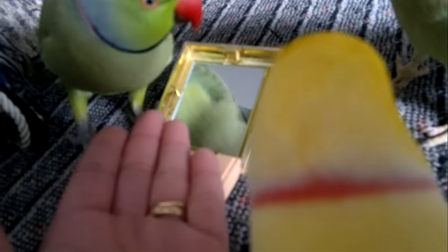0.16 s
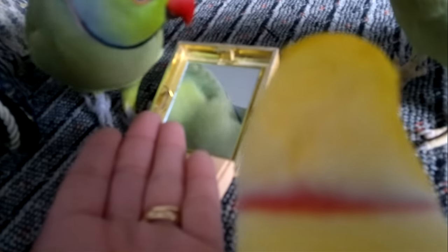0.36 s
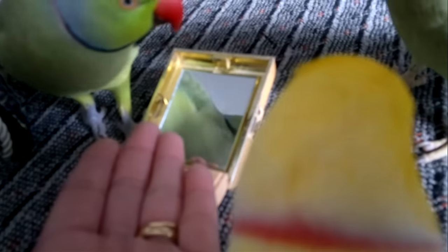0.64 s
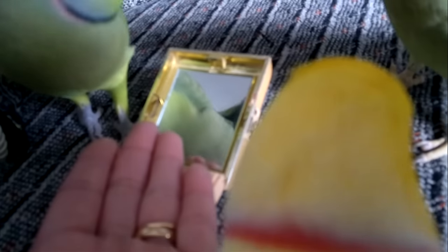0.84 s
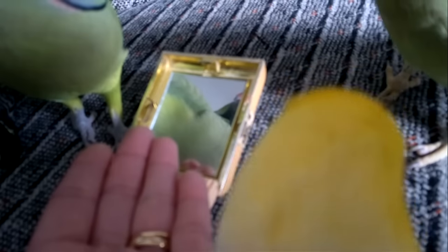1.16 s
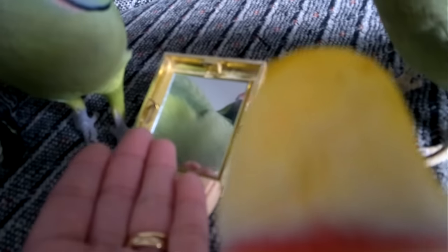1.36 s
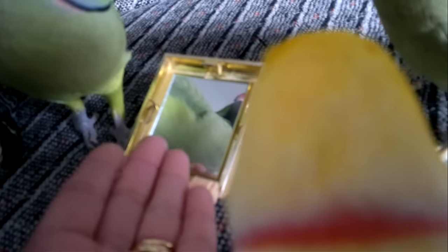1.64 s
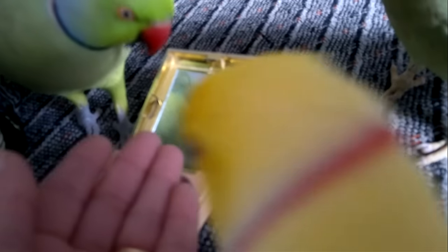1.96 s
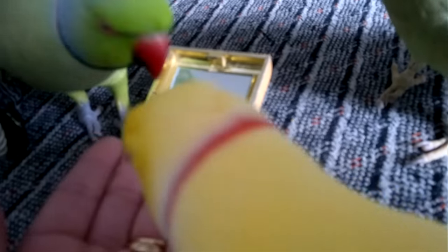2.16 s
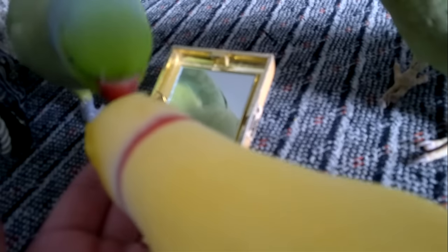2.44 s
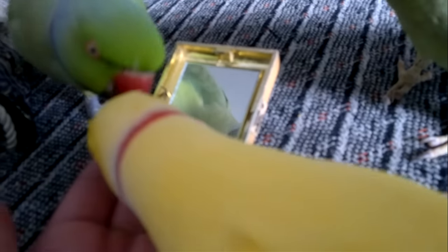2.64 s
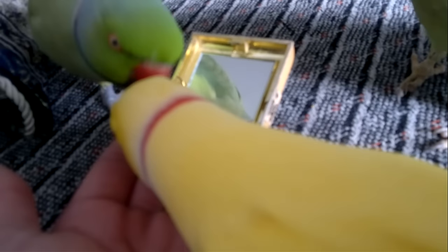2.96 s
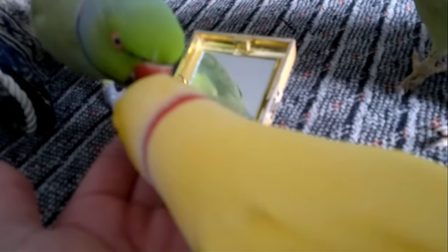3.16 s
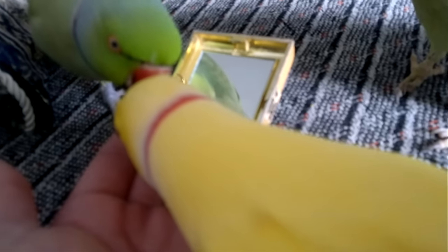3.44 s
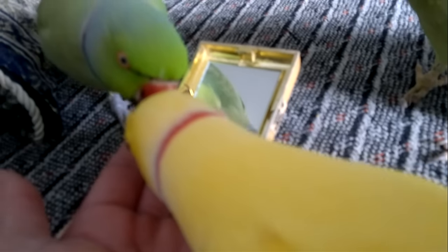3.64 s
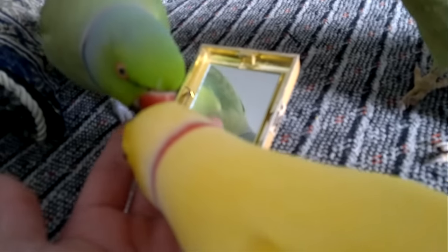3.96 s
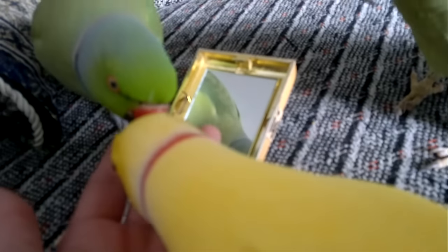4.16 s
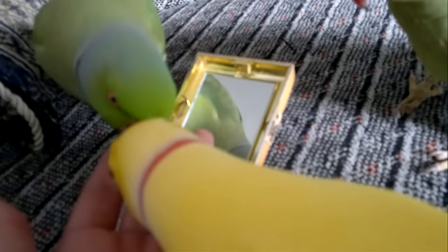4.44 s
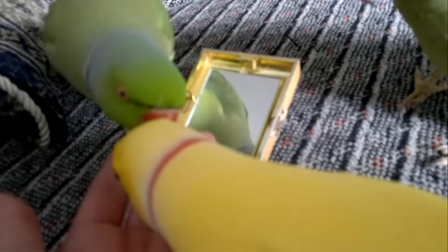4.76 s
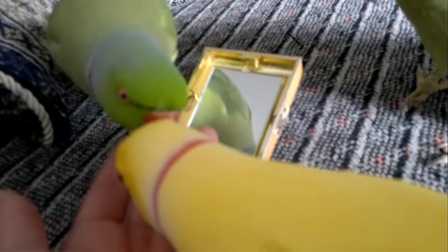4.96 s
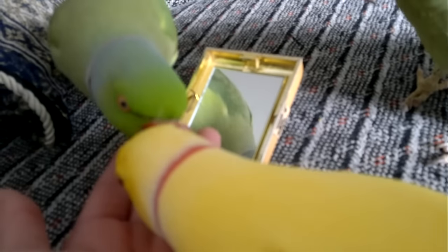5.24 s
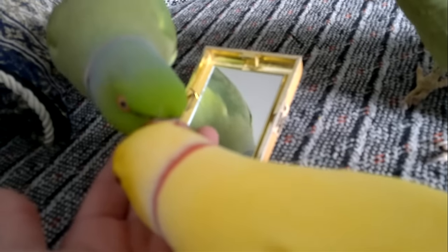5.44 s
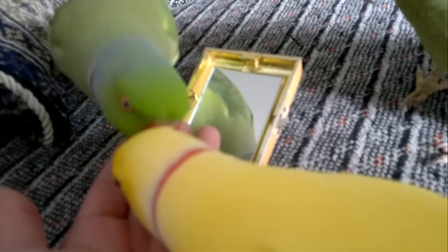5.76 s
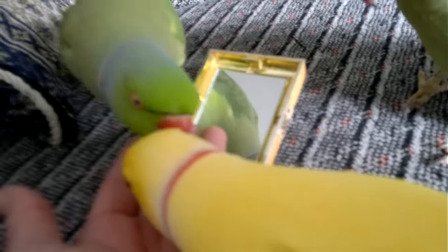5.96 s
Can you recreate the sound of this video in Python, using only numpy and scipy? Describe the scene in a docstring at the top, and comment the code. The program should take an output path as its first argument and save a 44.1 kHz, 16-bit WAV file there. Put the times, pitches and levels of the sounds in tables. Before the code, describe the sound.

First near silence: low handling shifts, light rustles, soft toneless bird puffs and one brief whistled squeak. After two seconds a few isolated beak clicks, then a run of sharp, ringing double-click pecks on a little mirror, four to five a second to the end, with dry taps on its frame growing busier and louder. Furnished room, very close stereo microphone, sound reaching the left slightly earlier and the right darker.

```python
"""Still air of a quiet, furnished room lasts throughout; hand shifts rumble early, brief rustles come now and then.
Close by on a carpet a pet parrot chuffs (noise through a throat resonance), peeps, whines and squeaks (whistles).
It pecks a small framed mirror four to five times a second, in ringing beak clicks and frame knocks,
with duller taps before, among and after the pecks.
Two close microphone ports hear it, the right one later and darker, with a diffuse room tail behind."""
import sys
import numpy as np
from scipy import signal
from scipy.fft import rfft, irfft, next_fast_len
from scipy.io import wavfile
from scipy.ndimage import uniform_filter1d, minimum_filter1d

SR = 44100
rng = np.random.default_rng(int(sys.argv[2]) if len(sys.argv) > 2 else 0)


def unload_audio(sound):
    """Save the sound as a 16-bit wav file, at the path given as the first command line argument."""
    columns = np.transpose(np.atleast_2d(sound))
    # keep every value between -1 and 1, then stretch to whole-number steps
    steps = np.round(np.clip(columns, -1, 1) * 32767)
    wavfile.write(sys.argv[1], SR, steps.astype(np.int16))


N = 268701
TIME = np.arange(N) / SR
BRIEF = np.arange(2048) / SR  # clock of one short impact

# Still room air: pitch_hz, relative level_db per Hz
ROOM_AIR = [(25, -13.5), (70, -2.5), (130, -10.5), (280, -14.5), (800, -20), (2000, -25.5), (4000, -31),
            (9000, -35), (12000, -36), (15000, -57.5)]
# Hand shifts, before the port gain: middle_s, rumble level_db, brushing level_db, half_length_s
HAND_SHIFTS = [(0.026, -61.5, -62, 0.063), (0.266, -60, -54.5, 0.078), (0.56, -62.5, -74.5, 0.22),
               (1.567, -59.5, -68.5, 0.18), (2.027, -60.5, -81, 0.042)]
# Spectra of handling rumble, hand brushing and rustling: pitch_hz, relative level_db per Hz
RUMBLE_SPECTRUM = [(20, 1), (45, 0), (72, 5), (110, -2.5), (200, -23), (400, -69)]
BRUSH_SPECTRUM = [(100, -26), (200, -6.5), (275, -0.5), (350, -13), (480, -11.5), (800, -16), (2000, -27),
                  (5000, -36)]
RUSTLE_SPECTRUM = [(1000, 2.5), (2500, -3), (6000, -2.5), (9000, 0), (12000, -6.5), (15000, -11)]
# Brief rustles, and the squeak's hiss, before the port gain: middle_s, level_db, half_length_s
BRIEF_RUSTLES = [(0.283, -73, 0.38), (0.915, -67, 0.012), (1.007, -63, 0.0062), (1.056, -66, 0.06),
                 (1.414, -56.5, 0.014), (1.789, -68, 0.013), (4.046, -58, 0.0063), (4.412, -59, 0.0086),
                 (5.008, -60, .017)]
# Dull taps on the frame: time_s, clack peak level_db, knock and tick level_db relative to the clack
FRAME_TAPS = [(0.485, -61, 6.5, -25), (1.199, -48.5, -2, -3.5), (1.5484, -35, -5.5, -12.5),
              (2.6282, -44.5, -25.5, -1), (2.7031, -40.5, -12, -17), (2.8266, -34.5, 0.5, -27.5),
              (2.9796, -47, -3.5, -30), (4.041, -26, -10.5, -28), (4.276, -29.5, -9.5, -15.5),
              (4.3024, -24, -14.5, -25), (4.404, -19, -30, -40), (4.416, -21.5, -17, -20),
              (4.5227, -34.5, -7.5, -16), (4.553, -23.5, -10, -14.5), (4.7859, -31, 0, -9.5),
              (4.813, -25.5, -9.5, -16), (5, -25.5, -16, -11.5), (5.0244, -22.5, -15.5, -16.5),
              (5.2391, -40, -8.5, -13), (5.3136, -7.5, -16.5, -11.5), (5.4489, -39.5, -5, -9.5),
              (5.5548, -11.5, -10.5, -12.5), (5.566, -22.5, -2, -34), (5.586, -24.5, -12, -16.5),
              (5.7358, -50, -5, -5.5), (5.8195, -26.5, -4, -7), (5.833, -16.5, -12, -23.5),
              (6.0722, -25.5, -2.5, -9.5), (6.0843, -26.5, -1, -27)]
# A tap's dry body, and the tick of the beak tip: pitch_hz, relative level_db
CLACK_SPECTRUM = [(500, -43), (1100, -10.5), (1700, 8), (2500, 6.5), (3800, -1.5), (5200, -7),
                  (7000, -32.5), (9000, -37)]
TICK_SPECTRUM = [(2000, -37), (4200, 1.5), (5800, 13.5), (7300, 2.5), (9500, 3), (12000, -4.5),
                 (15000, -38.5)]
# Modes of mirror and frame, damped by the carpet: nominal pitch_hz, nominal level_db, t60_s
FRAME_MODES = [(314, -7.5, 0.0099), (642, 0.5, 0.015), (1059.6, 1, 0.011)]
# Tiny rising peep: time_s, pitch_hz, fundamental level_db
PEEP_PATH = [(.782, 400, -62), (.797, 657, -47), (.81, 907, -47.5), (.822, 1034, -84)]
# Soft chuffs, and the squeak's breath, before a common trim: time_s, level_db, centre pitch_hz
CHUFF_CALLS = [(0.795, -55.5, 1650), (1.081, -57, 1160), (1.204, -53.5, 1710), (1.403, -57.5, 1900),
               (1.546, -52.5, 1990), (1.675, -55.5, 1880), (2.022, -53, 1840), (2.777, -66.5, 1614),
               (3.042, -52.5, 1280)]
# Faint whine that wavers and drops, before a 1 dB cut: time_s, pitch_hz, level_db
WHINE_PATH = [(1.045, 1366, -79), (1.065, 1394, -50), (1.09, 1434, -58), (1.108, 1130, -69),
              (1.122, 960, -45.5), (1.145, 940, -82)]
# The squeak: time_s, pitch_hz, fundamental level_db
SQUEAK_PATH = [(1.37, 2680, -50), (1.377, 2690, -53), (1.386, 2590, -23), (1.402, 2570, -12.5),
               (1.42, 2658, -21.5), (1.432, 2610, -39.5), (1.462, 2703, -48)]
# Single beak clicks, soft to hard: time_s, ring level_db, ring pitch_hz,
# knock level_db relative to the ring, extra scrape level_db
SINGLE_CLICKS = [(2.171, -32.5, 2450, -9.5, -11.5), (2.349, -46.5, 2450, -14.5, 0),
                 (2.4745, -30.5, 2560, -11.5, -9), (2.4807, -35, 2570, -13, -12),
                 (2.6437, -6, 2540, -26.5, -3), (5.8250, -10, 1710, -20.5, 9.5)]
# Pecks: first contact time_s, last contact time_s, first, middle and last level_db,
# last ring pitch_hz, last knock level_db relative to the ring, extra scrape level_db
PECK_ROWS = [(2.8572, 2.879, -1.5, -11.5, -8.5, 3078, -16, 0),
             (3.0563, 3.0822, -0.5, -5, -1, 2878, -20, -8), (3.2646, 3.2809, 1, -3.5, 5.5, 3050, -24.5, 2),
             (3.4751, 3.4995, -5, 1, 0.5, 3117, -18, 0), (3.709, 3.721, -3.5, -5.5, 0.5, 2875, -22.5, 4.5),
             (3.9251, 3.9366, 0, -15, 1.5, 2810, -15.5, 6.5),
             (4.1493, 4.159, -7.5, -7.5, 2, 2590, -26.5, 3),
             (4.368, 4.3817, -3.5, -8, -6.5, 2450, -23.5, 8.5),
             (4.6003, 4.6183, 2, -15, -1.5, 2650, -20, 5.5),
             (4.8291, 4.8427, -3, -1.5, -4.5, 2676, -23.5, 8.5), (5.0648, 5.0788, -7, -5, -4, 2600, -20, 8),
             (5.295, 5.3106, -5, 0.5, -4, 2980, -12, 9.5)]
# Two pecks shove the mirror against the floor: start_s, starting level_db, pitch_hz
FLOOR_THUMPS = [(3.938, -22.5, 300), (4.83, -15.5, 169)]
# Right port against the left: pitch_hz, level_db
RIGHT_PORT_SHADE = [(100, -3), (800, -4), (1600, 2), (2600, 0), (3500, -2), (5000, -9), (9000, -17),
                    (14000, -7)]
# Lead of the left port for sound from the mirror: pitch_hz, phase_radians
MIRROR_PORT_PHASE = [(0, 0), (430, 0.1), (1380, 1.0), (2070, 3.2), (3100, 4.7), (3450, 5.6), (3700, 5.7),
                     (3960, 6.7), (4310, 6.4), (4740, 7.4)]
# Room tail: pitch_hz, t60_s
ROOM_DECAY = [(300, 0.078), (1100, 0.16), (2150, 0.33), (3300, 0.15), (5000, 0.16), (7000, 0.023),
              (14000, 0.051)]
# Room tail colour: pitch_hz, relative level_db
ROOM_TINT = [(200, 0), (700, 0.5), (1500, 7.5), (2400, -4), (3400, 4), (4800, 3), (7000, -7), (14000, 5)]

# Ring and knock as the beak lands; both move to the row's last values as it presses on
FIRST_HZ, FIRST_KNOCK_DB = 2341, -24.5
MIDDLE_SHARE, PRESS_POWER = 0.37, 2.2  # when the middle contact comes; how late the pressure builds
# Each contact chatters: gap between clicks, loss times the click's number squared
CHATTER_S, CHATTER_LOSS_DB = 0.0025, 3
SLIP_DB, SLIP_SCATTER_DB = -16, 4  # tiny slips, against the peck's mean level
# The mirror rattles on after the last contact: mean gap, first level, loss a bounce
SETTLE_S, SETTLE_DB, SETTLE_LOSS_DB = 0.0064, -27, 4
TOP_HZ = 15800  # band limit


def amp(db):
    """Decibels to gain."""
    return 10 ** (np.asarray(db) / 20)


def unit(x):
    """Scale to rms 1."""
    return x / np.sqrt(np.mean(x ** 2) + 1e-20)


def crest(x):
    """Scale to an envelope peak of 1."""
    return x / np.abs(signal.hilbert(x)).max()


def along(points, hz):
    """Read (Hz, value) points on a log frequency axis."""
    f, values = np.transpose(points)
    return np.interp(np.log(hz + 1), np.log(f), values)


def filtered(x, response):
    """Multiply the spectrum of x by a complex response of frequency."""
    size = next_fast_len(N + SR // 2)
    spectrum = rfft(x, size) * response(np.fft.rfftfreq(size, 1 / SR))
    return irfft(spectrum, size)[..., :N]


def add(track, s, sound):
    """Mix a sound into a track at time s."""
    part = track[max(round(s * SR), 0):][:len(sound)]
    part += sound[:len(part)]


def noise(spectrum):
    """Coloured noise of rms 1, unrelated at the two ports."""
    white = rng.standard_normal((2, N))
    return unit(filtered(white, lambda hz: amp(along(spectrum, hz))))


def swell(middle_s, half_length_s):
    """A bell-shaped rise and fall of level."""
    return np.exp(-0.5 * ((TIME - middle_s) / half_length_s) ** 2)


def background(floor_db=-69):
    """Steady room air, with swells of handling rumble, brushing and brief rustles."""
    rumble = sum(amp(db) * swell(s, length) for s, db, _, length in HAND_SHIFTS)
    brush = sum(amp(db) * swell(s, length) for s, _, db, length in HAND_SHIFTS)
    rustle = sum(amp(db) * swell(s, length) for s, db, length in BRIEF_RUSTLES)
    air = amp(floor_db) * noise(ROOM_AIR)
    air += rumble * noise(RUMBLE_SPECTRUM)
    air += brush * noise(BRUSH_SPECTRUM)
    air += rustle * noise(RUSTLE_SPECTRUM)
    # each port shares a little of the other's air
    shared = air + 0.12 * air[::-1]
    # port gain: left 1.5 dB louder, right 1.5 dB softer
    return shared * amp([[1.5], [-1.5]])


def snap(spectrum, t60):
    """A decaying burst of grit through a causal minimum-phase colour, peak 1."""
    size = len(BRIEF)
    level = amp(along(spectrum, np.fft.rfftfreq(size, 1 / SR)))
    cepstrum = irfft(np.log(level))
    colour = np.exp(rfft(2 * cepstrum[:size // 2], size))
    grit = rng.standard_normal(size) * amp(-60 * BRIEF / t60)
    return crest(irfft(colour * rfft(grit)))


def knock(blow_db, scatter_db=3, detune=0.061, weight=0.189, even_db=-14):
    """The frame's modes, struck at a new spot each time; harder blows bring out the low ones. Peak 1."""
    tilt_db = weight * (even_db - blow_db)  # per octave
    modes = np.zeros(len(BRIEF))
    for hz, db, t60 in FRAME_MODES:
        level_db = db + tilt_db * np.log2(hz) + scatter_db * rng.normal()
        struck_hz = hz * np.exp(detune * rng.normal())
        modes += amp(level_db - 60 * BRIEF / t60) * np.sin(2 * np.pi * struck_hz * BRIEF)
    onset = (1 - np.exp(-BRIEF / 0.0006)) ** 2
    return crest(np.gradient(modes * onset))  # a small body radiates its change of speed


def taps(lead_s=0.00047):
    """Blows on the frame: a dry clack, a knock and the tick of the beak tip."""
    out = np.zeros(N)
    for s, db, knock_db, tick_db in FRAME_TAPS:
        clack = snap(CLACK_SPECTRUM, t60=0.015)
        tick = amp(tick_db) * snap(TICK_SPECTRUM, t60=0.035)
        add(out, s - lead_s, amp(db) * (clack + tick + amp(knock_db) * knock(db)))
    return out


def whistle(path, harmonics_db, jitter):
    """A slightly unsteady whistle: a sine and its harmonics follow a path of pitch and level."""
    s, path_hz, path_db = np.transpose(path)
    hz, db = np.interp(TIME, s, path_hz), np.interp(TIME, s, path_db)
    unsteady = 1 + jitter * unit(uniform_filter1d(rng.standard_normal(N), size=40))
    phase = 2 * np.pi * np.cumsum(hz * unsteady) / SR
    sounding = (TIME > s[0]) & (TIME < s[-1])
    tone = sum(amp(level) * np.sin(k * phase) for k, level in enumerate(harmonics_db, 1))
    return sounding * amp(db) * tone


def peep():
    """A tiny rising whistle with a strong second harmonic."""
    return whistle(PEEP_PATH, [0, -7], jitter=0.01)


def chuffs(rise_s=0.014, fall_s=0.021, octaves=0.51, trim_db=1):
    """Soft chuffs, and the squeak's breath: toneless noise through one resonance of the bird's throat."""
    out = np.zeros(N)
    t = np.arange(SR // 4) / SR - 1 / 8
    f = np.fft.rfftfreq(len(t), 1 / SR) + 1
    breath = np.exp(-0.5 * (t / np.where(t < 0, rise_s, fall_s)) ** 2)
    for s, db, hz in CHUFF_CALLS:
        throat = 1 / (1 + (np.log2(f / hz) / octaves) ** 6)
        air = unit(irfft(rfft(rng.standard_normal(len(t))) * throat, len(t)))
        add(out, s + t[0], amp(db + trim_db) * air * breath)
    return out


def whine():
    """A faint single tone with a strongly wavering pitch."""
    return whistle(WHINE_PATH, [-1], jitter=0.04)


def squeak():
    """One short whistle with two weaker harmonics."""
    return whistle(SQUEAK_PATH, [0, -12, -34], jitter=0.0041)


def beak(hz, swell_s=0.00074, upper=1.193, upper_db=-15, edge_db=30, usual_hz=2500):
    """The hollow beak rings for a few cycles; the higher its pitch, the more its upper mode joins in."""
    u = BRIEF / swell_s
    upper_gain = amp(upper_db + edge_db * np.log2(hz / usual_hz))  # edge_db is per octave
    phase = 2 * np.pi * hz * BRIEF
    return (u * np.exp(1 - u)) ** 2 * (np.sin(phase) + upper_gain * np.sin(upper * phase))


def contact(db, hz, knock_db, extra_db, scrape_db=-17, tick_db=-33, bright_hz=2500, tick_scatter_db=4):
    """One click of the beak: it rings, scrapes, ticks and knocks the frame; higher rings are grittier."""
    scrape_gain = amp(scrape_db + extra_db) * (hz / bright_hz) ** 2
    scrape = scrape_gain * snap(CLACK_SPECTRUM, t60=0.01)
    tick = amp(tick_db + tick_scatter_db * rng.normal()) * snap(TICK_SPECTRUM, t60=0.012)
    return amp(db) * (beak(hz) + scrape + tick + amp(knock_db) * knock(db))


def single_clicks(lead_s=0.00056, graze_s=0.002, graze_db=-14):
    """The beak grazes the mirror more softly, then clicks just once."""
    out = np.zeros(N)
    for s, db, hz, knock_db, extra_db in SINGLE_CLICKS:
        add(out, s - lead_s - graze_s, contact(db + graze_db, hz, knock_db, extra_db))
        add(out, s - lead_s, contact(db, hz, knock_db, extra_db))
    return out


def peck_clicks(first_db, middle_db, last_db, graze_s=0.0025, graze_db=-16, uneven=0.1, scatter_db=2.5):
    """Clicks of one peck as (share of the way through, delay s, dB): graze, three chattering contacts, slips."""
    clicks = [(0, -graze_s, first_db + graze_db)]
    for share, db in [(0, first_db), (MIDDLE_SHARE, middle_db), (1, last_db)]:
        for k, (late, loud) in enumerate(rng.standard_normal(size=(3, 2))):
            delay = k * CHATTER_S * (1 + uneven * late)
            clicks.append((share, delay, db - CHATTER_LOSS_DB * k ** 2 + scatter_db * loud))
    slip_db = np.mean([first_db, middle_db, last_db]) + SLIP_DB
    for share in rng.uniform(size=12):
        clicks.append((share, 0, slip_db + SLIP_SCATTER_DB * rng.normal()))
    return clicks


def pecks(lead_s=0.0007, detune=0.035):
    """Rattles of hard beak contacts whose ring and knock shift as the beak presses on the mirror."""
    out = np.zeros(N)
    for first, last, first_db, middle_db, last_db, last_hz, last_knock_db, extra_db in PECK_ROWS:
        for share, delay, db in peck_clicks(first_db, middle_db, last_db):
            press = share ** PRESS_POWER
            hz = (FIRST_HZ + press * (last_hz - FIRST_HZ)) * np.exp(detune * rng.normal())
            knock_db = FIRST_KNOCK_DB + press * (last_knock_db - FIRST_KNOCK_DB)
            s = first - lead_s + share * (last - first) + delay
            add(out, s, contact(db, hz, knock_db, extra_db))
    return out


def rattle(knock_db=-6, uneven=0.2):
    """After each peck in the table the mirror bounces three times, ever softer, as it settles."""
    out = np.zeros(N)
    for _, last, *_ in PECK_ROWS:
        for k, late in enumerate(rng.standard_normal(size=3)):
            db = SETTLE_DB - SETTLE_LOSS_DB * k
            bounce = snap(CLACK_SPECTRUM, t60=0.0053) + amp(knock_db) * knock(db)
            add(out, last + SETTLE_S * (k + 1 + uneven * late), amp(db) * bounce)
    return out


def thumps(t60=0.0041):
    """Dead, low pushes through the carpet: sines that die within milliseconds."""
    out = np.zeros(N)
    for s, db, hz in FLOOR_THUMPS:
        add(out, s, amp(db - 60 * BRIEF / t60) * np.sin(2 * np.pi * hz * BRIEF))
    return out


def mirror_phase(hz, lag_s=0.00024):
    """Sound from the mirror bends round the microphone body; in the treble it simply comes late."""
    f, radians = np.transpose(MIRROR_PORT_PHASE)
    return np.interp(hz, f, radians) + 2 * np.pi * lag_s * np.maximum(hz - f[-1], 0)


def ports(x, phase):
    """The right port hears x later, by a phase that depends on frequency, and shaded in the treble."""
    right = filtered(x, lambda hz: amp(along(RIGHT_PORT_SHADE, hz)) * np.exp(-1j * phase(hz)))
    return np.array([x, right])


def room(x, onset_s=0.0025, build_s=0.0012):
    """Diffuse answer of the walls, from crossfaded noise tails that vary along the scene."""
    out = np.zeros((2, N))
    step = SR // 4
    fade = np.sqrt(signal.windows.hann(2 * step))
    for start in range(0, N - step, step):
        hz, t, grains = signal.stft(rng.standard_normal((2, SR // 2)), SR, nperseg=256)
        decay_db = 60 * t / along(ROOM_DECAY, hz)[:, None]
        shape = amp(along(ROOM_TINT, hz)[:, None] - decay_db) * (1 - np.exp(-t / build_s))
        tail = signal.istft(grains * shape, SR, nperseg=256)[1]
        tail = tail / np.linalg.norm(tail[0])
        part = x[start:start + 2 * step]
        wet = signal.fftconvolve((part * fade[:len(part)])[None], tail, axes=1)
        for track, sound in zip(out, wet):
            add(track, start / SR + onset_s, sound)
    return out


def scene(call_lag_s=0.0002066, chuff_lag_s=0.000084):
    """Bird and mirror close by, the room behind them; the calls come from a spot nearer the middle."""
    frame = taps() + rattle() + thumps()
    calls = peep() + whine() + squeak()
    breaths, singles, rattling_pecks = chuffs(), single_clicks(), pecks()
    # how much of each source reaches the walls
    to_walls = amp(-20) * rattling_pecks + amp(-25) * singles + amp(-23) * frame
    to_walls += amp(-27) * calls + amp(-13) * breaths
    mirror = ports(rattling_pecks + singles + frame, mirror_phase)
    bird = ports(calls, lambda hz: 2 * np.pi * hz * call_lag_s)
    bird += ports(breaths, lambda hz: 2 * np.pi * hz * chuff_lag_s)
    return background() + mirror + bird + room(to_walls)


def record(dry):
    """A fast look-ahead limiter holds peaks at full scale, then everything above the band limit is cut."""
    needed = 1 / np.maximum(np.abs(dry).max(axis=0), 1)
    held = minimum_filter1d(needed, size=121)
    gain = uniform_filter1d(uniform_filter1d(held, size=61), size=61)
    return filtered(dry * gain, lambda hz: hz < TOP_HZ)


dry = scene()
out = record(dry)
unload_audio(out)
```